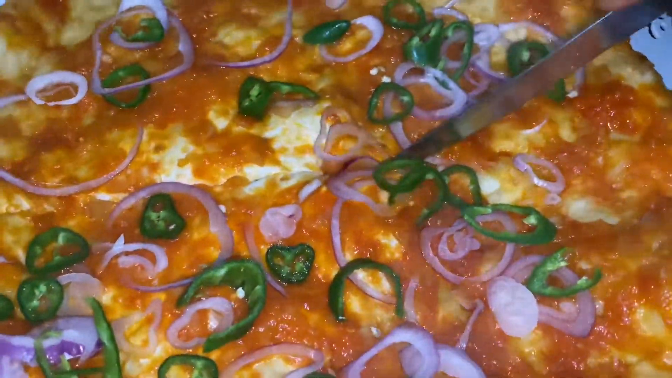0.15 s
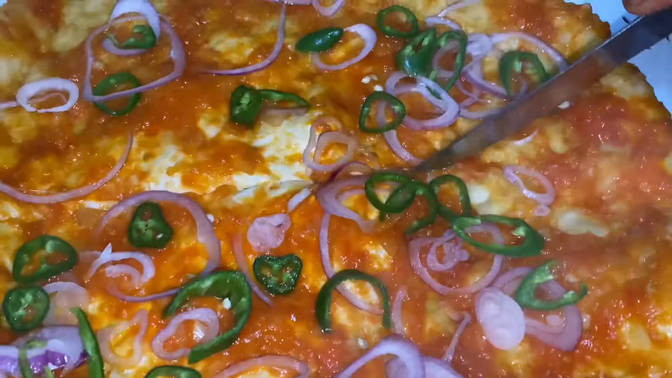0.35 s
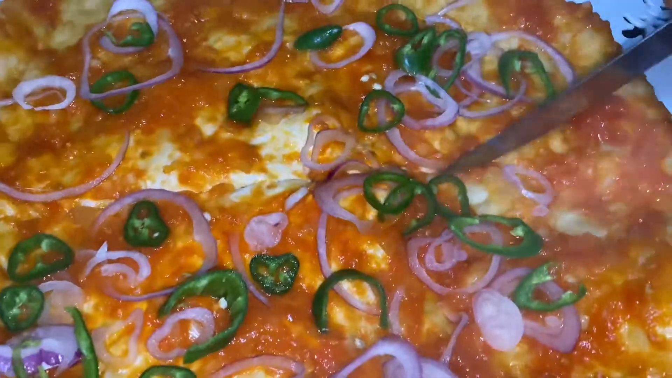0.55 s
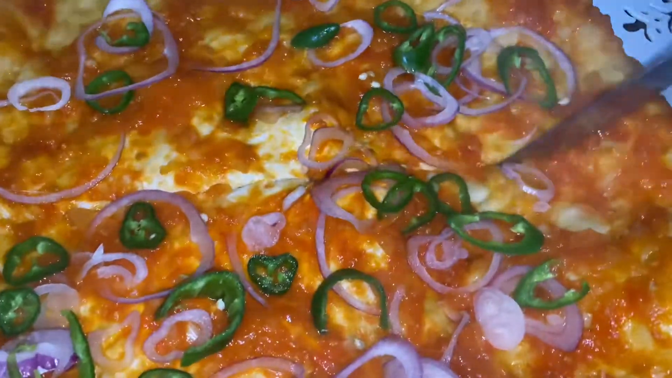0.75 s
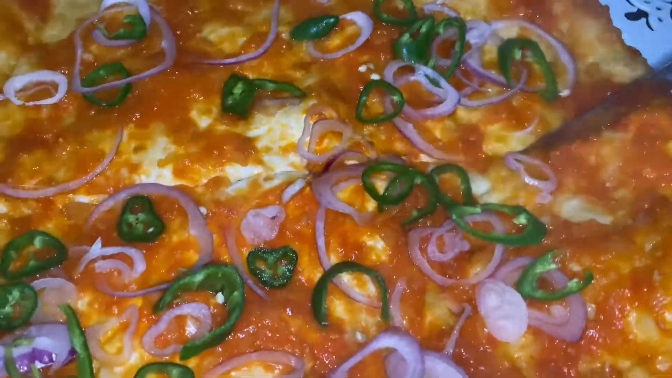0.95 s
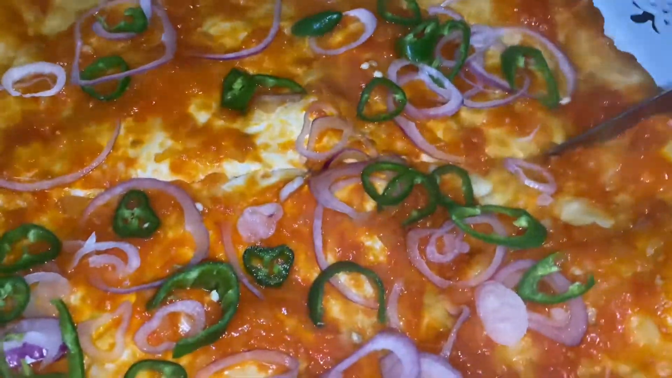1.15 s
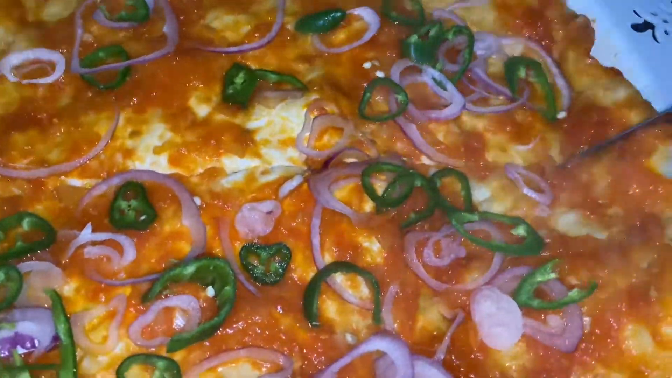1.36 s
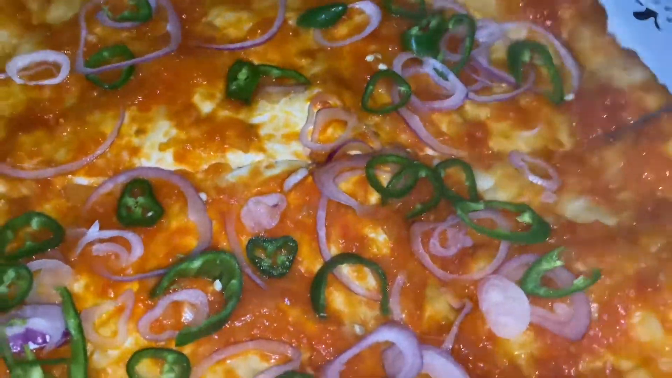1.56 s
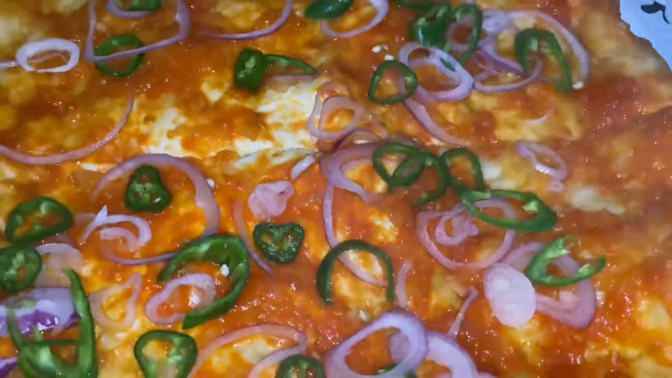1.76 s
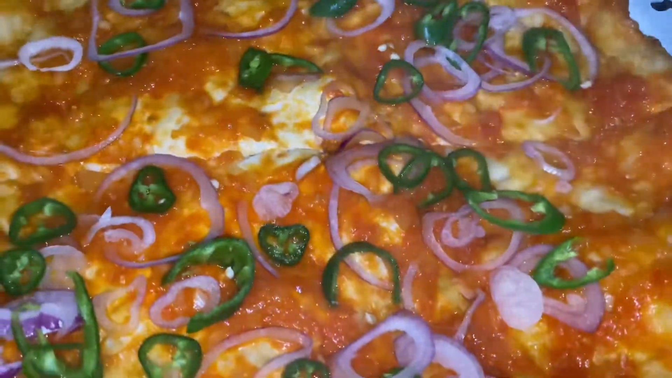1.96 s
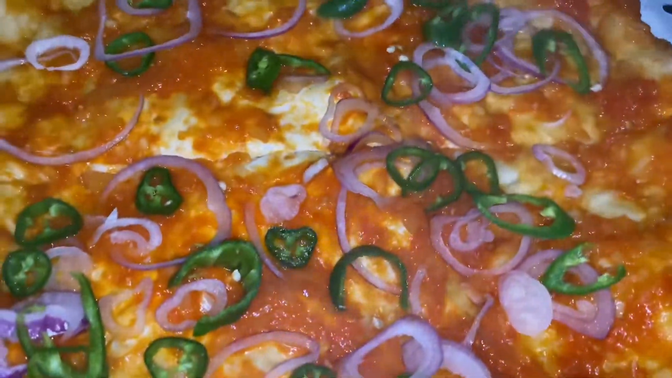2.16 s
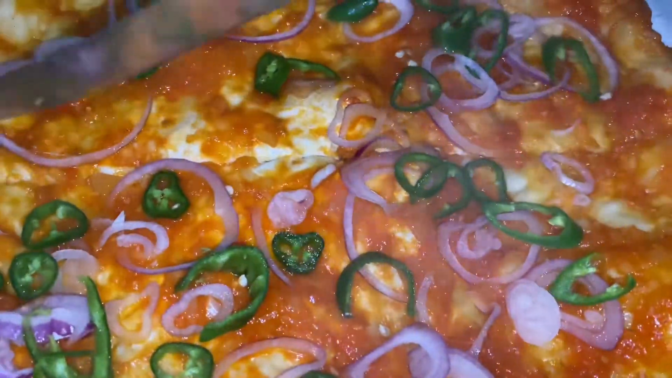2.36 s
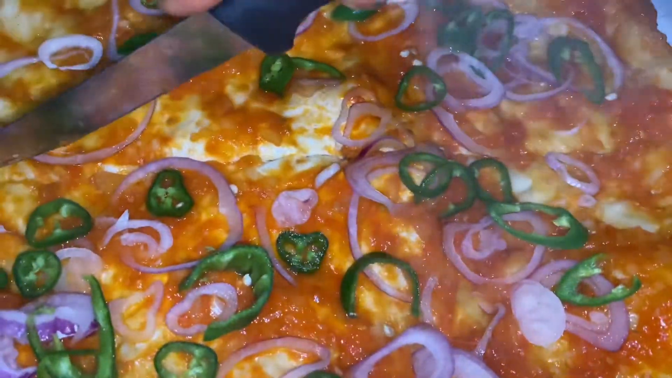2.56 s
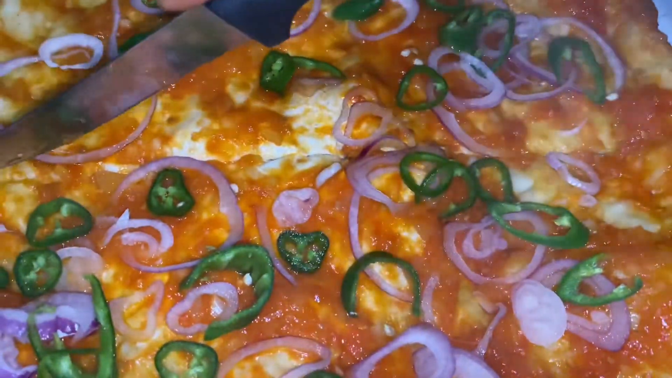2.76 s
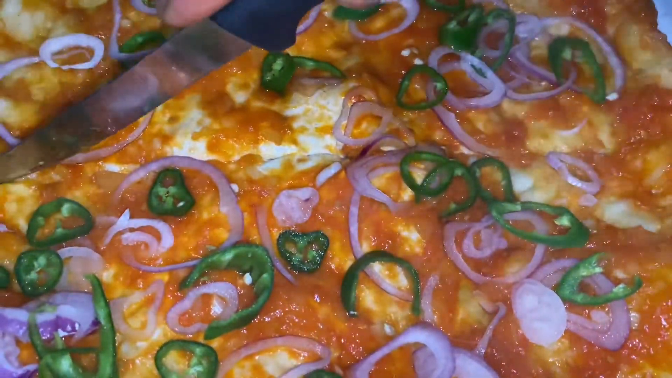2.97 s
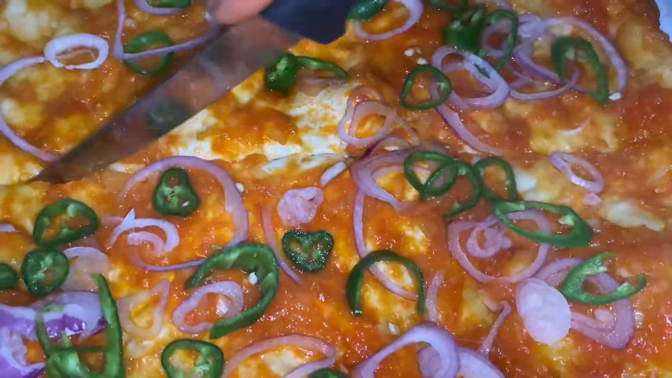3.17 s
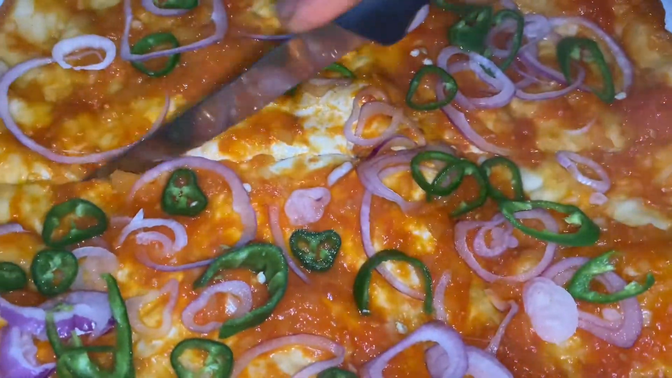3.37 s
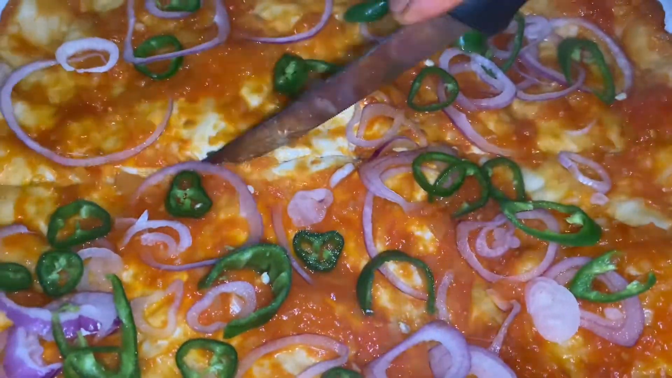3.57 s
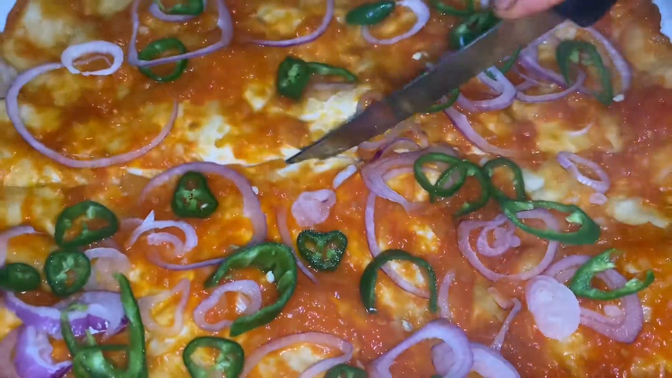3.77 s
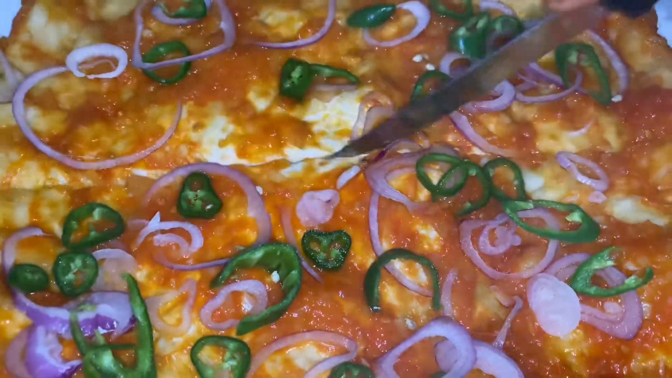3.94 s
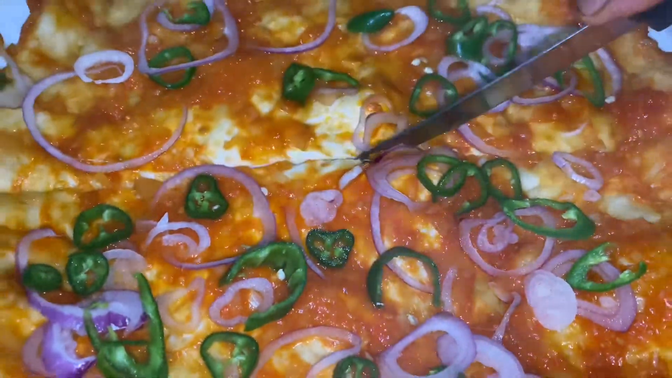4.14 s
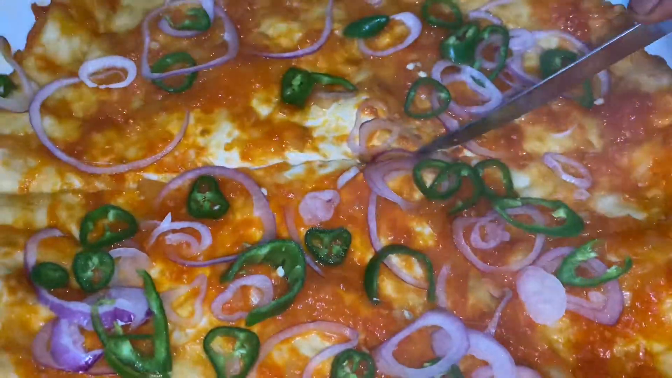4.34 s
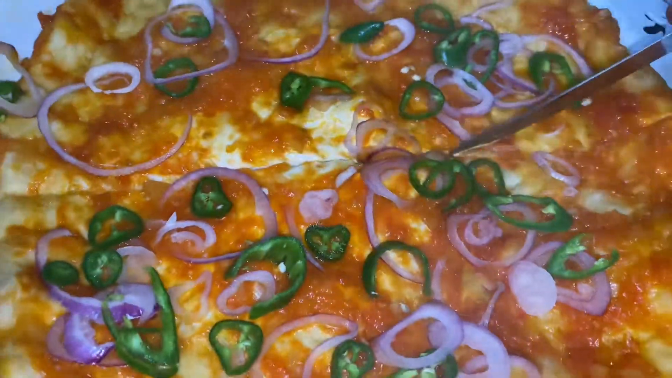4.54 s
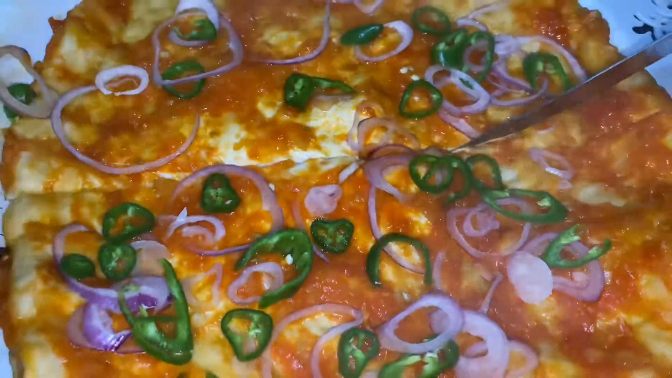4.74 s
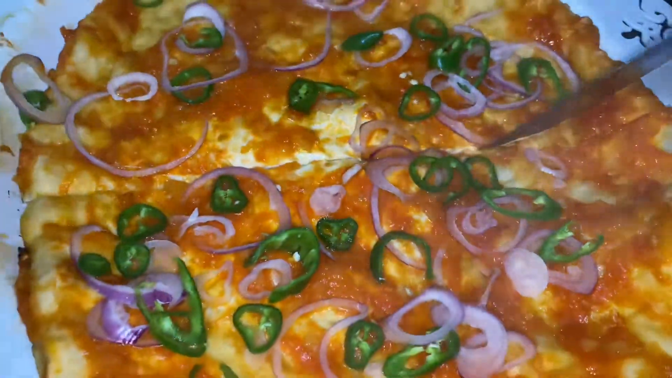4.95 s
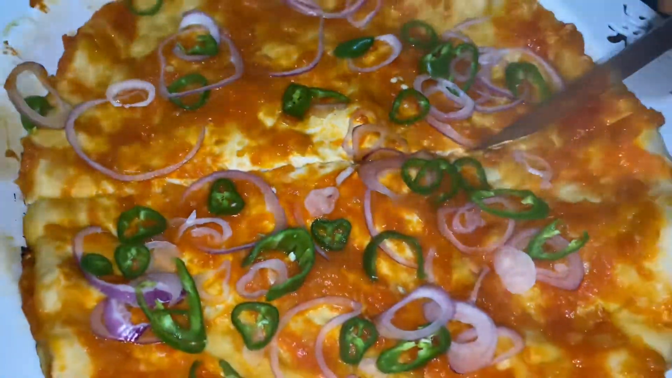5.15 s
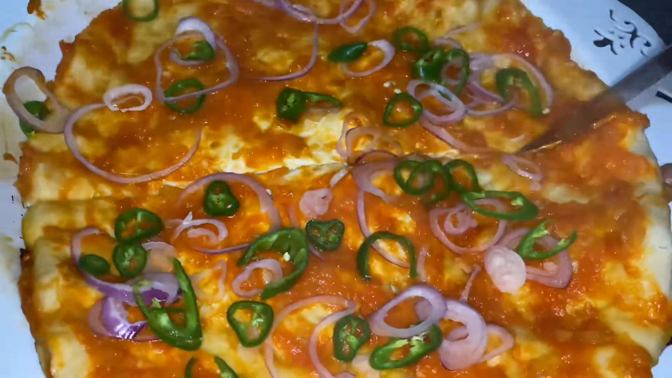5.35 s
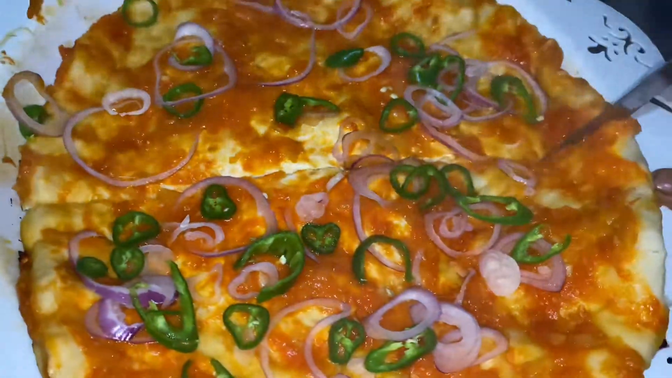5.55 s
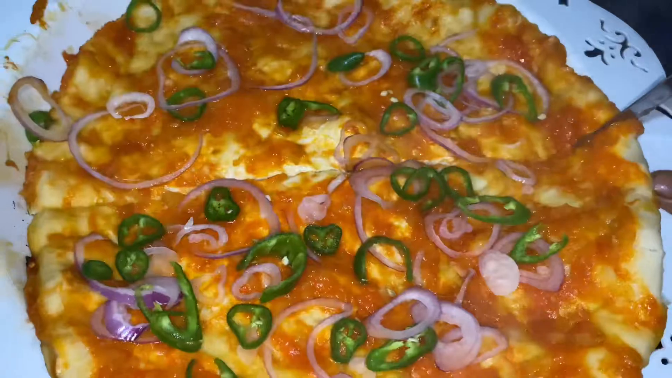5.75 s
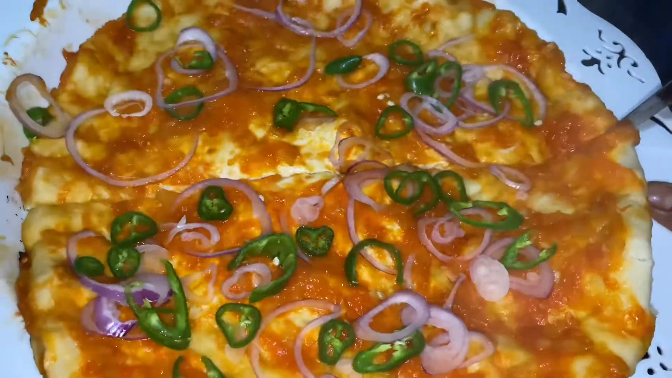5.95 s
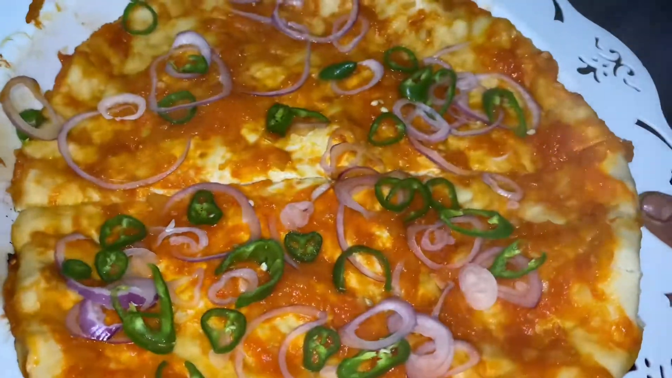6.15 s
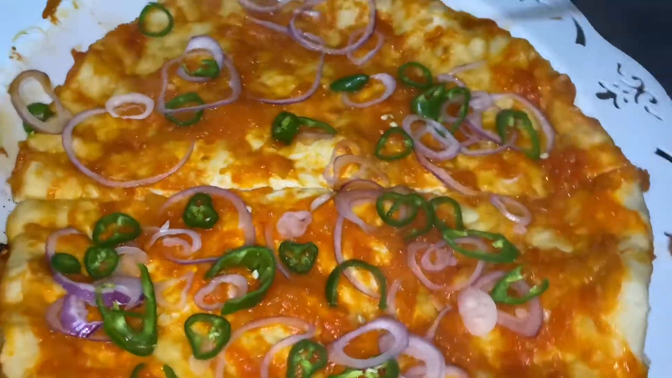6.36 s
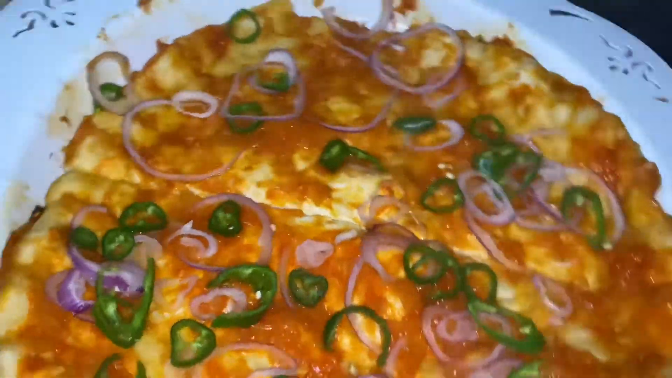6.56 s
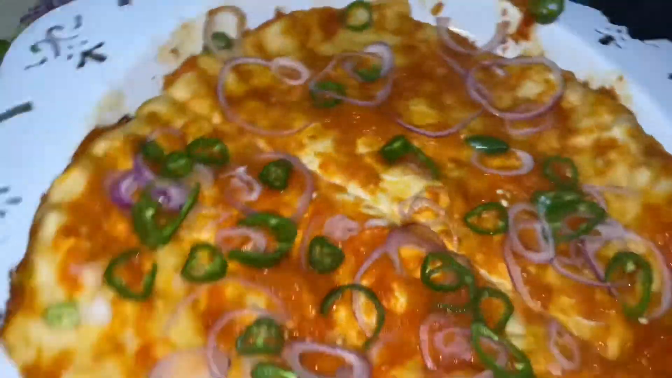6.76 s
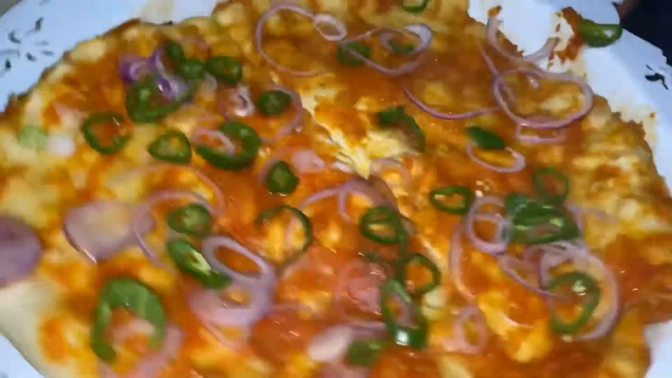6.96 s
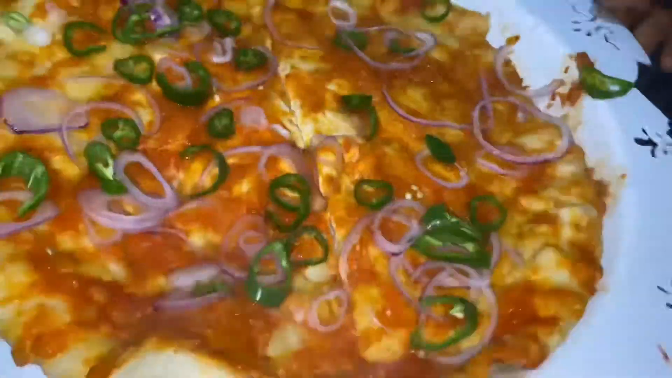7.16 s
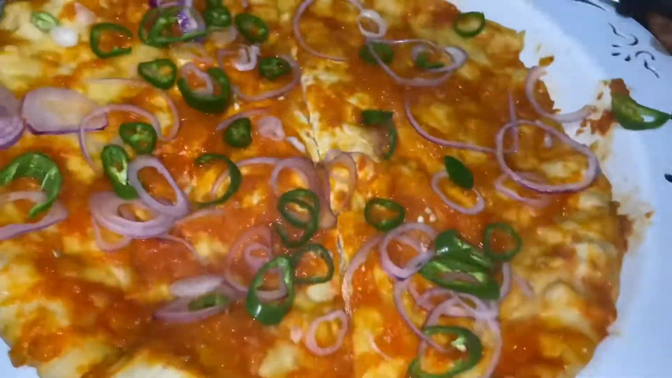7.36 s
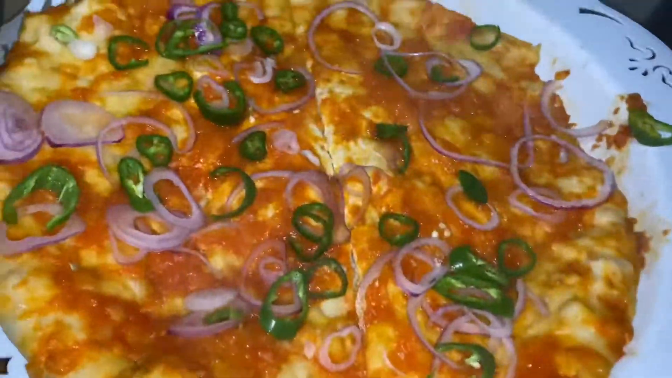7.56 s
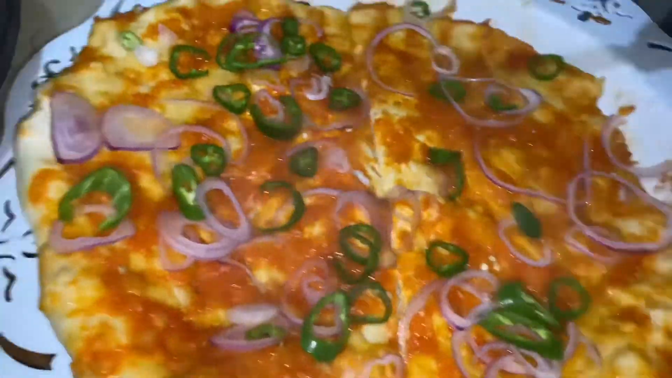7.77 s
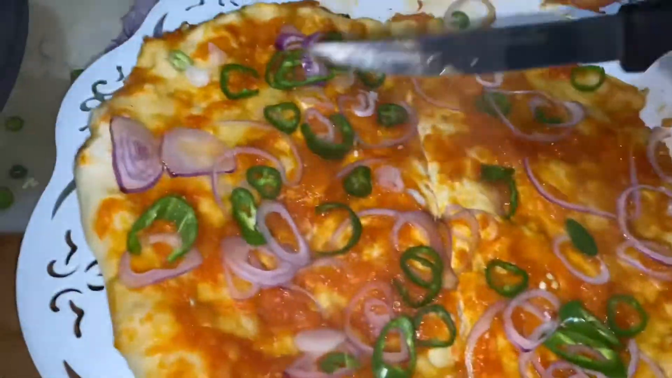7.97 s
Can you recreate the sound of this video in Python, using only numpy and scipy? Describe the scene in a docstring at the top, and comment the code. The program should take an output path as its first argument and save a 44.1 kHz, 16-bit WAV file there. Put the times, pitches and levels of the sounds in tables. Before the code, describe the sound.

A serrated knife saws through a baked pizza on a plastic plate, very close to the microphone. The crust crunches and snaps, sauce and crumbs tick, and the plate drones and knocks on the counter, with brief rasps of the blade. After a short lull the cutting resumes. Near the end the plate is turned with a scuff and set down. A quiet kitchen hums faintly behind.

```python
"""A steak knife saws through a baked pizza on a plastic plate, close to a phone's two microphone ports.
At each stroke the teeth slip and catch: the crust crumbles and snaps, the base tears, sauce and crumbs
tick, and the plate drones and knocks on the counter. Where the edge drags on the plate, the blade sings.
Near the end the plate is turned, scuffing, and set down. Farther off, a quiet kitchen hums and hisses."""
import sys
import numpy as np
from scipy import signal
from scipy.fft import rfft, irfft, next_fast_len
from scipy.io import wavfile
from scipy.ndimage import map_coordinates

SR = 44100
rng = np.random.default_rng(int(sys.argv[2]) if len(sys.argv) > 2 else 0)


def waveform_to_disk(signal):
    """Save audio, clipped to [-1, 1], as 16-bit WAV at the path in sys.argv[1]."""
    frames = np.transpose(np.atleast_2d(signal))
    scaled = np.clip(frames, -1, 1) * 32767
    samples = np.round(scaled).astype(np.int16)
    wavfile.write(sys.argv[1], SR, samples)


N = 353241

# Room tone, far from the microphones: f/Hz, density/dB
KITCHEN_SPECTRUM = [(25, -10), (55, 2.5), (130, 2.5), (280, -11), (560, -7.5), (720, -21.5), (1000, -28.5),
                    (1450, -26), (2500, -25), (5000, -27.5), (7500, -28.5), (10500, -17.5), (15800, -23.5)]
# Slow course of the room tone: t/s, level/dB
KITCHEN_LEVEL = [(0, -70), (1.8, -65.5), (1.96, -68.5), (2.1, -65), (4.1, -63.5), (5.05, -64.5), (6.0, -64),
                 (7.45, -62), (8, -61)]
# Rise and dip of the room tone's hiss: t/s, gain/dB
KITCHEN_HISS_GAIN = [(0, -1), (1.95, -1.5), (2.5, 3.5), (4.12, 0), (4.75, 2.5), (5.05, 0.5), (6.9, 5),
                     (7.45, -1.5), (7.7, 2.5)]
# Decay of the room: f/Hz, t60/s
ROOM_DECAY = [(200, 0.14), (2000, 0.13), (10000, 0.083)]
# The plate slid round on the counter: start/s, fastest/s, stop/s, level/dB
PLATE_TURNS = [(6.431, 6.789, 6.93, -55), (6.824, 6.847, 7, -56.5), (7.197, 7.24, 7.38, -64.5),
               (7.736, 7.808, 7.6, -58.5)]
# Its foot rubbing: f/Hz, density/dB
FOOT_SPECTRUM = [(500, -4.5), (900, 2), (1800, -1.5), (3000, -9), (4500, -7.5), (6000, -9.5), (8000, -14),
                 (9500, -37.5)]
# Fine hiss of rubbing and of tiny breaks: f/Hz, density/dB
FINE_SPECTRUM = [(5500, 13.5), (7200, 0), (9500, 26.5), (12500, 20.5), (14000, 20), (15800, 22.5)]
# Sticky ticks of sauce and crumbs: t/s, level/dB, lower band over that level/dB
STICKY_TICKS = [(0.109, -39, 0.5), (0.32, -47.5, -10), (0.3377, -37, -2), (0.545, -41.5, -3.5),
                (0.7769, -40.5, 2.5), (0.9385, -46.5, -21), (1.003, -46.5, -3), (1.0322, -45.5, -3),
                (1.295, -48, 3), (1.344, -45, -9), (1.5492, -43, 3), (2.0102, -47, 1), (2.0686, -52, 5),
                (2.4288, -50.5, -3), (2.7315, -48.5, -12.5), (2.835, -39.5, -3), (2.89, -40.5, -3),
                (2.9607, -46.5, -11), (3.056, -47.5, 2.5), (3.544, -45, -9), (3.5988, -42.5, -12),
                (3.6964, -49, 3), (3.7367, -38, 1), (3.9922, -44.5, 3), (4.199, -47.5, -9), (4.251, -47, 1),
                (4.375, -46, -0.5), (4.4098, -38, -1.5), (4.641, -46, 3), (4.9226, -43.5, -2),
                (5.0619, -52, -20), (5.2037, -42.5, -7), (5.292, -39, 0), (5.358, -43.5, -3),
                (5.4288, -32, -15), (5.597, -46, -5), (5.617, -39.5, -4), (5.8531, -46.5, -14),
                (6.1022, -33, -3), (6.1447, -37, -17), (7.005, -44, -22), (7.2253, -41, -10),
                (7.541, -43.5, -2.5), (7.637, -41.5, -9), (7.713, -45, -23), (7.813, -41.5, -3.5),
                (7.898, -44, -11), (7.979, -49.5, -21)]
# Lower band of a tick: f/Hz, density/dB
TICK_LOW_SPECTRUM = [(1200, -29), (2500, 2), (4500, 1.5), (8000, 0)]
# Drags of the edge on the plate: t/s, length/s, level/dB, favoured f/Hz
EDGE_DRAGS = [(.099, 0.027, -57.5, 2560), (0.803, 0.24, -71, 2540), (0.79, 0.2, -77, 3992),
              (1.036, 0.17, -77, 2410), (1.402, 0.054, -56.5, 2310), (1.405, 0.054, -61, 3660),
              (1.716, 0.087, -56, 1200), (3.058, 0.2, -71, 4370), (3.108, 0.13, -62, 1245),
              (3.357, 0.1, -65.5, 4300), (3.371, 0.068, -57, 1240), (5.359, 0.12, -51, 1220),
              (5.355, 0.084, -64, 3020), (5.36, 0.077, -64, 5023), (5.808, 0.08, -55, 1414),
              (6.092, 0.072, -55, 4980), (6.103, 0.06, -52, 3040), (7.756, 0.067, -55, 920),
              (7.758, 0.04, -58, 1820)]
# Bending modes of the blade: f/Hz, width/Hz, level/dB
BLADE_MODES = [(950, 250, 2), (1200, 300, 3.5), (1930, 300, 2), (2410, 100, 2), (2660, 120, 1),
               (3020, 600, -2), (3660, 300, -3), (4400, 1100, 1), (5000, 900, -2)]
# Pieces of crust breaking: t/s, level/dB, shard f/Hz
CRUST_SNAPS = [(0.1024, -35, 1410), (0.339, -41, 2047), (0.5473, -47, 2070), (0.778, -34.5, 1880),
               (1.004, -48.5, 2440), (1.0342, -45, 1255), (1.0492, -36.5, 1280), (1.1612, -46, 2400),
               (1.273, -40, 1830), (1.296, -35.5, 1890), (1.349, -30.5, 1270), (1.4065, -47, 1900),
               (1.5208, -47, 1310), (1.5486, -29.5, 1780), (1.678, -46, 1500), (1.7423, -31, 2020),
               (1.789, -43.5, 3500), (1.8997, -48, 1570), (2.0111, -52.5, 1792), (2.0665, -57, 1480),
               (2.8332, -51.5, 3980), (2.889, -50.5, 4930), (2.9631, -32.5, 1615), (3.0552, -54, 4100),
               (3.1377, -42.5, 1340), (3.3835, -47, 1337), (3.474, -41.5, 1080), (3.7323, -36, 1450),
               (3.7432, -30, 1930), (3.992, -45, 2970), (4.204, -46, 1300), (4.2497, -46, 1830),
               (4.369, -49.5, 3060), (4.408, -40.5, 3070), (4.423, -37, 2970), (4.445, -49, 3000),
               (4.4716, -51.5, 3060), (4.529, -56, 1770), (4.562, -46.5, 2420), (4.601, -55, 1800),
               (4.6512, -31, 1224), (4.817, -55, 1300), (4.856, -47, 2460), (4.924, -51, 1500),
               (5.2766, -36.5, 2290), (5.3, -38.5, 1980), (5.323, -54, 1680), (5.356, -41.5, 1400),
               (5.378, -48, 1800), (5.4026, -29.5, 1360), (5.4286, -24, 1253), (5.6189, -33.5, 1480),
               (5.7076, -53, 1740), (6.099, -38, 1540), (6.148, -21, 1460), (6.2175, -42.5, 1870),
               (6.38, -46, 1880), (6.6339, -51, 1740), (6.756, -38, 1390), (6.8409, -31.5, 1410),
               (7.1056, -31, 2280), (7.1365, -30, 2200), (7.547, -54, 2970), (7.7654, -49, 1980),
               (7.898, -54.5, 2055)]
# Crack of such a break: f/Hz, density/dB
CRACK_SPECTRUM = [(500, -6), (900, 11), (1500, 4.5), (2500, -1.5), (4000, -10), (5500, -11.5), (7000, -15),
                  (9000, -22.5)]
# Knocks of the plate: t/s, peak/dB, favoured f/Hz
PLATE_KNOCKS = [(0.002, -34.5, 165), (0.066, -36, 162), (0.11, -23.5, 310), (0.248, -31, 587),
                (0.249, -40.5, 162), (0.324, -31, 254), (0.347, -33, 400), (0.544, -31.5, 330),
                (0.562, -38, 586), (0.592, -38.5, 277), (0.777, -36, 285), (0.848, -38, 235),
                (0.925, -41, 132), (1.047, -33.5, 282), (1.27, -36.5, 327), (1.351, -31, 280),
                (1.406, -36.5, 510), (1.454, -36, 197), (1.546, -27.5, 387), (1.564, -41, 131),
                (1.663, -32.5, 220), (1.681, -30, 160), (1.742, -29, 473), (1.762, -29.5, 476),
                (1.795, -40, 110), (1.894, -40, 256), (2.599, -49, 228), (2.833, -50.5, 447),
                (2.964, -23.5, 423), (2.982, -35.5, 390), (3.056, -38.5, 477), (3.138, -37.5, 440),
                (3.395, -39.5, 580), (3.474, -27, 594), (3.677, -29.5, 228), (3.735, -26, 540),
                (3.743, -22.5, 473), (3.996, -31, 350), (4.204, -33, 274), (4.249, -35.5, 302),
                (4.425, -28.5, 530), (4.65, -29.5, 530), (4.855, -39.5, 269), (5.267, -35.5, 460),
                (5.28, -30.5, 470), (5.299, -28, 460), (5.336, -34, 440), (5.359, -30, 403),
                (5.406, -27, 443), (5.429, -20.5, 383), (5.617, -39.5, 247), (5.81, -38, 288),
                (5.827, -37.5, 456), (5.955, -41, 215), (6.096, -42.5, 410), (6.151, -24.5, 453),
                (6.635, -38.5, 410), (6.757, -36.5, 367), (6.841, -30.5, 500), (6.853, -34, 218),
                (7.11, -21.5, 600), (7.112, -19, 178), (7.139, -26.5, 283), (7.209, -37.5, 180),
                (7.549, -49.5, 158), (7.644, -45.5, 315), (7.765, -38, 430)]
# Modes of the plate: f/Hz, level/dB, t60 as a share of the ring time
PLATE_MODES = [(64, -1.5, 0.62), (103.4, -13, 4.8), (117, -11.5, 2.1), (157.2, 3.5, 0.99), (214, 3, 1.01),
               (285, 2, 0.76), (357.3, -1.5, 0.77), (414, 0.5, 0.8), (484.6, -1.5, 0.59),
               (582.1, 0.5, 0.77), (698, -9, 0.64), (826, -11, 0.49), (1165, -15, 0.32)]
# Bending-wave delay, longest on the first cut: t/s, lag/s of a mode at half ON_TIME_HZ
BENDING_LAG = [(0.3, 0.0045), (1.9, 0.004), (3.7, 0.002), (7.1, 0.0005)]
# Swells of scraping: saw strokes, then from about 6.4 s the plate shifted and set down:
# full pressure from t/s, hold/s, drone level/dB, crunch over drone/dB, rumble over drone/dB
SCRAPE_SWELLS = [(0, 0.017, -50.5, -14.5, 2), (0.108, 0.0097, -39, -16.5, -11.5),
                 (.23, 0.012, -53.5, -9, 2), (0.333, 0.054, -56, -5.5, 3.5),
                 (0.451, 0.0116, -48.5, -19, -7), (0.552, 0.13, -50.5, -15, -2),
                 (0.781, 0.073, -46.5, -16.5, -12), (.9, 0.073, -52, -13, 1.5),
                 (1.046, 0.2, -45.5, -19.5, -9), (1.29, 0.026, -57.5, -0.5, -10),
                 (1.333, 0.012, -37, -15.5, -24), (1.413, 0.074, -38.5, -23, -20),
                 (1.551, 0.071, -54.5, -8, 5), (1.673, 0.13, -42, -30, -6), (1.89, 0.0197, -60, -34, -20),
                 (2.069, 0.0186, -67, -4, 1.5), (2.6, 0.047, -66.5, -29, 2), (2.84, 0.16, -63, -4.5, -4),
                 (2.96, 0.052, -50.5, -15.5, -25), (3.063, 0.17, -52.5, -18, -1),
                 (3.393, 0.055, -50.5, -7.5, -3), (3.685, 0.013, -56.5, -6.5, -12),
                 (3.726, 0.017, -40.5, -12, -8.5), (3.926, 0.081, -46.5, -13.5, -11.5),
                 (4.204, 0.065, -49, -15.5, -10), (4.405, 0.052, -53, -6.5, 0.5),
                 (4.52, 0.065, -56.5, -6, -9), (4.65, 0.035, -52, -11.5, -5.5),
                 (4.846, 0.081, -53.5, -11, -5.5), (5.156, 0.052, -61, -4, -1),
                 (5.288, 0.19, -43, -10.5, -35.5), (5.598, 0.03, -51.5, -6, -15),
                 (5.7, 0.062, -57, -6.5, -3), (5.815, 0.051, -42.5, -15.5, -11),
                 (5.973, 0.075, -47, -15.5, -16), (6.096, 0.084, -56.5, 5.5, -34.5),
                 (6.24, 0.18, -62.5, -5.5, 5.5), (6.367, 0.11, -60.5, -4.5, -6),
                 (6.627, 0.18, -52.5, -26, -19), (6.849, 0.017, -44.5, -16, -12),
                 (6.93, 0.13, -63.5, -4, 2.5), (7.131, 0.02, -38, -15, -10), (7.22, 0.14, -56, -9, 0.5),
                 (7.54, 0.029, -65.5, 2.5, 14), (7.65, 0.1, -61.5, -6, 4.5),
                 (7.771, 0.044, -50.5, -2.5, -21), (7.9, 0.038, -59.5, -20, 1)]
# Rumble of the counter: f/Hz, density/dB
COUNTER_SPECTRUM = [(25, -21), (42, 6), (60, 17.5), (85, 9), (115, 16), (160, -31.5)]
# Crumbling crust: f/Hz, density/dB
CRUST_SPECTRUM = [(500, 2.5), (850, 1.5), (1400, -0.5), (2500, -4), (3800, -8), (5200, -13.5),
                  (7000, -14.5), (9000, -14.5)]
# Coarse tearing of the base: f/Hz, density/dB
DOUGH_SPECTRUM = [(550, -18), (750, -2), (1100, 5), (1700, 4.5), (2500, -10), (3500, -25)]
# Likeness of the two microphone ports: f/Hz, likeness from 0 to 1
PORT_LIKENESS = [(100, 0.96), (350, 0.7), (700, 0.4), (1700, 0.35), (3500, 0), (6000, 0), (7000, 0.8),
                 (8800, 0.95)]
# Their balance: f/Hz, left over right/dB
PORT_BALANCE = [(60, 0), (110, 7), (200, 0.5), (380, 7), (700, 0.5), (1290, 3), (2380, 7), (4400, 11),
                (8120, 1), (15000, -0.5)]
# Their phase: f/Hz, lead of the left/rad
PORT_LEAD = [(0, 0), (650, .3), (900, 2.6), (1800, 5.6), (3000, 8.6), (7250, 4 * np.pi), (15450, 0),
             (16500, -1.6)]

RISE_DB_PER_S, SAG_DB_PER_S, FALL_DB_PER_S = 408, 15.5, 237  # base slopes, scaled by a layer's steepness
LOADED_RING_S, FREE_RING_S, FREE_FROM_S = 0.035, 0.11, 7.0  # once turned, the unloaded plate rings longer
ON_TIME_HZ = 600  # plate modes below this arrive late
PITCH_SCATTER = 0.03  # random share by which each mode's pitch varies from knock to knock
KNOCK_DB_PER_OCTAVE, BLADE_DB_PER_OCTAVE = 12, 35  # modes fall away from the favoured pitch
PLATE_SPLIT_HZ = 330  # the modes below and above are shaken by unrelated catches
LEAN_DB_PER_OCTAVE = 2.5  # the drone leans to the pitch that the knocks favour
TIME = np.arange(N) / SR


def amp(db):
    """Gain of a level in dB."""
    return 10 ** (np.asarray(db) / 20)


def unit(x):
    """x at rms 1."""
    return x / np.sqrt(np.mean(x ** 2) + 1e-20)


def along(points, hz):
    """Read (f/Hz, value) points on a log frequency axis."""
    f, v = np.transpose(points)
    return np.interp(np.log(hz + 1), np.log(f + 1), v)


def wobble(rate):
    """A smooth random curve, rate knots a second."""
    return map_coordinates(rng.standard_normal(int(N * rate / SR) + 4), [TIME * rate])


def filtered(x, response):
    """x times a complex response of frequency."""
    m = next_fast_len(N + SR // 2)
    return irfft(rfft(x, m) * response(np.fft.rfftfreq(m, 1 / SR)), m)[..., :N]


def coloured(x, spectrum):
    """x shaped by a spectrum, at rms 1."""
    return unit(filtered(x, lambda hz: amp(along(spectrum, hz)) * (hz > 15)))


def recoloured(x, spectrum):
    """x shaped by a spectrum, at its own rms."""
    return np.sqrt(np.mean(x ** 2)) * coloured(x[:, :N], spectrum)


def band_noise(pitch_hz, width_hz):
    """Two streams of noise in one resonance that follows pitch_hz, at rms 1."""
    pole = np.exp(-np.pi * width_hz / SR)
    slow = signal.lfilter([1], [1, -2 * pole, pole ** 2], rng.standard_normal((2, 2, len(pitch_hz))))
    phase = 2 * np.pi * np.cumsum(pitch_hz) / SR
    return unit(slow[0] * np.cos(phase) + slow[1] * np.sin(phase))


def grit(per_s, spread_db, life_s, smooth):
    """Two unrelated streams from the same crumbs: short noise bursts of unequal size over a steady rub."""
    sizes = (rng.random(N) < per_s / SR) * amp(spread_db * np.minimum(rng.exponential(size=N), 3))
    bursts = signal.lfilter([1], [1, -np.exp(-1 / (life_s * SR))], sizes)
    return (smooth + unit(bursts)) * rng.standard_normal((2, N))


def fracture(t, rise_s, t60, tail, tail_t60):
    """Envelope of a break: a fast rise, a short decay and a weaker tail as crumbs settle."""
    return (1 - np.exp(-t / rise_s)) * (amp(-60 * t / t60) + tail * amp(-60 * t / tail_t60))


def kitchen():
    """Room tone: far hum and hiss that drift slowly in level."""
    level_db = np.interp(TIME, *np.transpose(KITCHEN_LEVEL))
    drift_db = 1.8 * wobble(5)
    air = coloured(rng.standard_normal((2, N)), KITCHEN_SPECTRUM)
    hiss = filtered(air, lambda hz: (hz > 900) & (hz < 7500))
    hiss_gain = amp(np.interp(TIME, *np.transpose(KITCHEN_HISS_GAIN)))
    return amp(level_db + drift_db) * (air + (hiss_gain - 1) * hiss)


def walls(x):
    """The walls answer just after the direct sound; each frequency dies at its own speed."""
    hz, t, noise = signal.stft(rng.standard_normal((2, SR // 2)), SR, nperseg=256)
    tail = signal.istft(noise * amp(-60 * t / along(ROOM_DECAY, hz)[:, None]), SR, nperseg=256)[1]
    delayed = np.pad(x, ((0, 0), (300, 0)))
    return signal.fftconvolve(delayed, tail / np.linalg.norm(tail[0]), axes=1)[:, :N]


def plate_turns():
    """The plate's foot scuffs along the counter, louder the faster it turns."""
    gain = sum(amp(db) * np.interp(TIME, [start, fastest, stop], [0, 1, 0]) ** 1.63
               for start, fastest, stop, db in PLATE_TURNS)
    rub = coloured(grit(150, spread_db=3.5, life_s=.004, smooth=.8), FOOT_SPECTRUM)
    hiss = amp(-5) * coloured(rng.standard_normal((2, N)), FINE_SPECTRUM)
    judder = amp(3.5 * wobble(25))
    return gain * judder * (rub + hiss)


def sticky_ticks():
    """Sauce and crumbs part in tiny breaks a few milliseconds long, over the whole treble."""
    high, low = np.zeros((2, 2, N + SR))
    t = np.arange(SR // 16) / SR
    shape = fracture(t, rise_s=.0004, t60=.012, tail=.22, tail_t60=.07)
    for s, db, low_db in STICKY_TICKS:
        at = slice(round(s * SR), round(s * SR) + len(t))
        high[:, at] += amp(db - 0.5) * shape * rng.standard_normal((2, len(t)))
        low[:, at] += amp(db + min(low_db, 3) - 2) * shape * rng.standard_normal((2, len(t)))
    lower_band = filtered(recoloured(low, TICK_LOW_SPECTRUM), lambda hz: hz < 7820)
    return recoloured(high, FINE_SPECTRUM) + lower_band


def blade_rasp():
    """Fast slips of the teeth on the plate keep the blade's bending modes going while the drag lasts."""
    song = np.zeros((2, N + SR))
    for s, length, db, favoured_hz in EDGE_DRAGS:
        progress = np.linspace(0, 1, round(length * SR))
        at = slice(round(s * SR), round(s * SR) + len(progress))
        swell = np.sin(np.pi * progress) ** 0.72
        sag = 1 - 0.216 * length * (progress - .5)  # pitch sinks as the edge runs out
        for hz, width_hz, mode_db in BLADE_MODES:
            if .6 < hz / favoured_hz < 1.7:
                level = amp(db + mode_db - BLADE_DB_PER_OCTAVE * abs(np.log2(hz / favoured_hz)))
                song[:, at] += level * swell * band_noise(hz * sag, width_hz)
    return song[:, :N] * amp(4 * wobble(150))  # the teeth bite unevenly


def crust_snaps():
    """A piece of crust breaks: a short crack that rings at the shard's pitch, then crumbs settle."""
    crack, shard = np.zeros((2, 2, N + SR))
    t = np.arange(SR // 8) / SR
    crack_shape = fracture(t, rise_s=.0008, t60=.012, tail=.16, tail_t60=.09)
    shard_shape = fracture(t, rise_s=.0008, t60=.025, tail=.1, tail_t60=.09)
    for s, db, hz in CRUST_SNAPS:
        at = slice(round(s * SR), round(s * SR) + len(t))
        crack[:, at] += amp(db) * crack_shape * rng.standard_normal((2, len(t)))
        shard[:, at] += amp(db - 10.5) * shard_shape * band_noise(np.full(len(t), hz), width_hz=hz / 3)
    return recoloured(crack, CRACK_SPECTRUM) + shard[:, :N]


def plate_knocks():
    """Each knock rings the plate around a favoured pitch; bending waves bring the low modes last."""
    knocks = np.zeros((2, N + SR))
    hz, mode_db, share = np.transpose(PLATE_MODES)[..., None]
    for s, db, favoured_hz in PLATE_KNOCKS:
        lag = np.interp(s, *np.transpose(BENDING_LAG)) * np.maximum(ON_TIME_HZ / hz - 1, 0)
        t = np.maximum(np.arange(SR // 5) / SR - lag, 0)
        t60 = share * (LOADED_RING_S if s < FREE_FROM_S else FREE_RING_S)
        fade = (1 - np.exp(-t * hz / 1.27)) * amp(-60 * t / t60)
        blow = 1 + amp(3 - 60 * t / .028)  # the first swing stands out over the ring
        pitch = hz * (1 + PITCH_SCATTER * rng.standard_normal((2, len(PLATE_MODES), 1)))
        favour_db = -KNOCK_DB_PER_OCTAVE * abs(np.log2(hz / favoured_hz))
        level = amp(mode_db + favour_db + 1.84 * rng.standard_normal(pitch.shape))
        phase = rng.random(pitch.shape) * [[[0]], [[1]]]  # in step in the shared stream
        ring = (level * fade * blow * np.sin(2 * np.pi * (pitch * t + phase))).sum(axis=1)
        at = slice(round(s * SR), round(s * SR) + t.shape[1])
        knocks[:, at] += amp(db) * ring * [[1], [.6]] / np.abs(ring[0]).max()
    return knocks[:, :N]


def plate_response(hz, ring_s):
    """The plate's modes as a causal sum of resonances of alternating sign."""
    response = 0
    for k, (mode_hz, db, share) in enumerate(PLATE_MODES):
        width_hz = np.log(1000) / np.pi / (share * ring_s)
        damping = 1j * hz * width_hz
        response += (-1) ** k * amp(db) * damping / (mode_hz ** 2 - hz ** 2 + damping)
    return response


def plate_drone():
    """Slips shake the plate's modes, leaning low or high with the knocks' favoured pitch; at rms 1."""
    below, above = (amp(2 * wobble(18)) * grit(120, spread_db=2, life_s=.003, smooth=1) for _ in range(2))
    knock_s, _, favoured_hz = np.transpose(PLATE_KNOCKS)
    lean = amp(LEAN_DB_PER_OCTAVE * np.interp(TIME, knock_s, np.log2(favoured_hz / PLATE_SPLIT_HZ)))
    highpass = lambda hz: 1 / (1 + (PLATE_SPLIT_HZ / (hz + 1)) ** 6)
    slips = below / lean + filtered(above * lean - below / lean, highpass)
    return unit(filtered(slips, lambda hz: plate_response(hz, ring_s=0.072)))


def pressure(level_db, steepness):
    """Gain of a layer: every swell rises, holds while sagging a little, and falls away."""
    power = np.zeros(N)
    for (s, hold, *_), db in zip(SCRAPE_SWELLS, level_db):
        at = slice(max(round((s - .3) * SR), 0), round((s + hold + .5) * SR))
        t = TIME[at] - s
        loss_db = (RISE_DB_PER_S * np.maximum(-t, 0) + SAG_DB_PER_S * np.clip(t, 0, hold)
                   + FALL_DB_PER_S * np.maximum(t - hold, 0))
        power[at] += amp(db - steepness * loss_db) ** 2
    return np.sqrt(power)


def scraping():
    """The serrated edge, later the shifted plate, slips and catches: rumble, drone, crunch and tearing."""
    _, _, drone_db, crunch_db, rumble_db = np.transpose(SCRAPE_SWELLS)
    catch = wobble(22)
    shaking = amp(2.3 * wobble(6)) * coloured(rng.standard_normal((2, N)), COUNTER_SPECTRUM)
    rumble = pressure(drone_db + rumble_db, steepness=0.5) * shaking
    drone = pressure(drone_db, steepness=1) * amp(0.44 * catch) * plate_drone()
    crumbs = coloured(grit(260, spread_db=3.5, life_s=.0025, smooth=.55), CRUST_SPECTRUM)
    crunch = pressure(drone_db + crunch_db, steepness=1.21) * amp(0.65 * catch) * crumbs
    fine_rub = coloured(grit(82, spread_db=8, life_s=.00061, smooth=4.3), FINE_SPECTRUM)
    hiss = pressure(drone_db + crunch_db - 8.5, steepness=2.8) * amp(0.47 * catch) * fine_rub
    tearing = coloured(grit(110, spread_db=4, life_s=.004, smooth=.8), DOUGH_SPECTRUM)
    dough = pressure(drone_db - 17, steepness=3.2) * tearing
    return rumble + drone + crunch + hiss + dough


def scene():
    """Knife and plate up close, kitchen behind, in two streams: what the ports share and what differs."""
    near = scraping() + plate_turns() + blade_rasp() + plate_knocks() + crust_snaps() + sticky_ticks()
    return near + amp(-11.5) * walls(near) + kitchen()


def record(dry):
    """The phone's microphone pair near the plate: likeness, balance and lead, then its band limits."""
    angle = lambda hz: np.arccos(np.clip(along(PORT_LIKENESS, hz), 0, 1)) / 2
    shared, apart = filtered(dry, lambda hz: np.array([np.cos(angle(hz)), np.sin(angle(hz))]))
    left_right = np.array([shared + apart, shared - apart])
    side = np.array([[.5], [-.5]])
    balance = lambda hz: amp(side * along(PORT_BALANCE, hz))
    lead = lambda hz: np.exp(1j * side * np.interp(hz, *np.transpose(PORT_LEAD)))
    bottom_hz, top_hz = 36, 15850
    band = lambda hz: (hz < top_hz) / (1 + (bottom_hz / (hz + 1)) ** 4)
    return filtered(left_right, lambda hz: balance(hz) * lead(hz) * band(hz))


dry = scene()
out = record(dry)
waveform_to_disk(out)
```